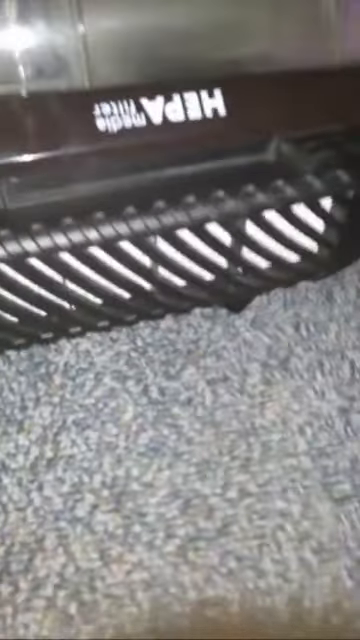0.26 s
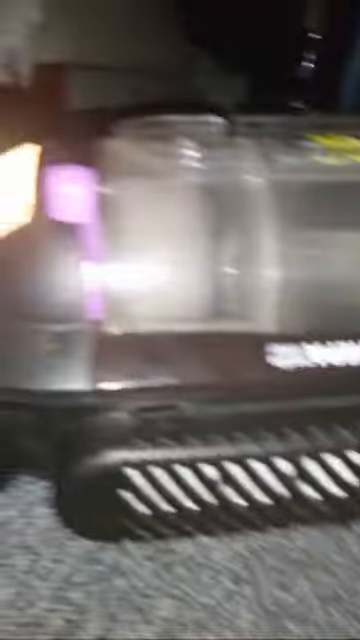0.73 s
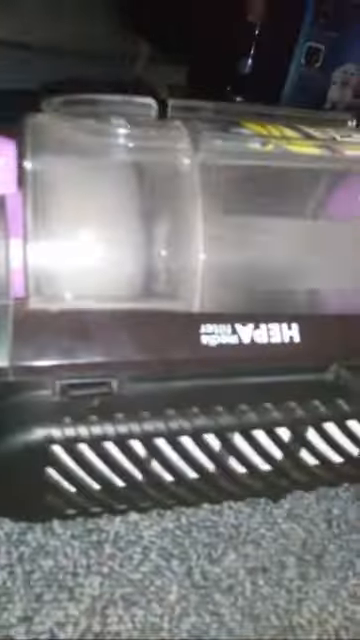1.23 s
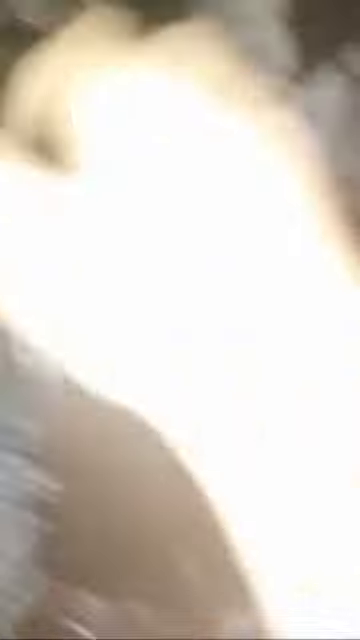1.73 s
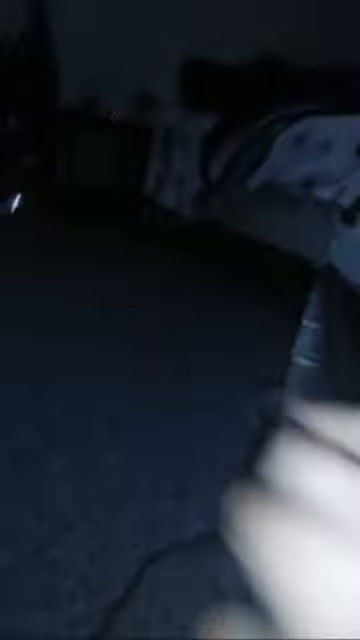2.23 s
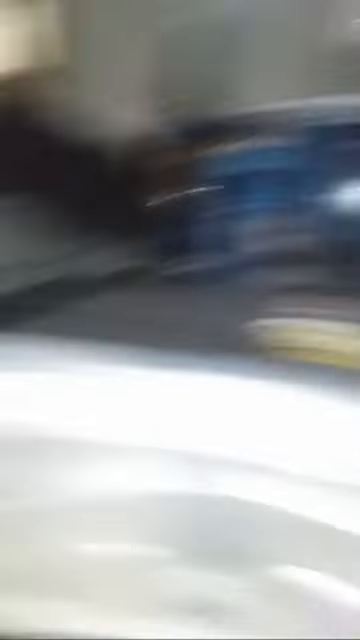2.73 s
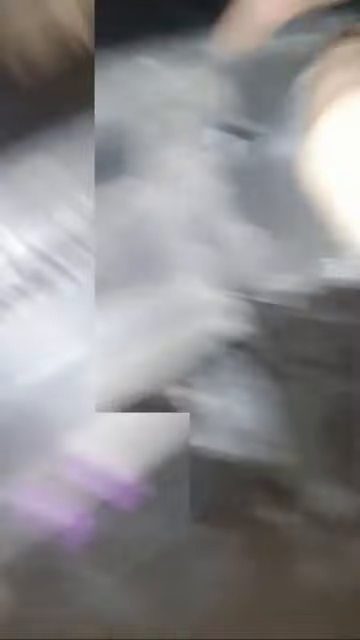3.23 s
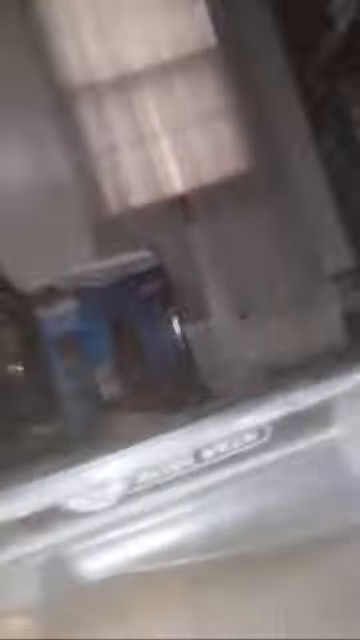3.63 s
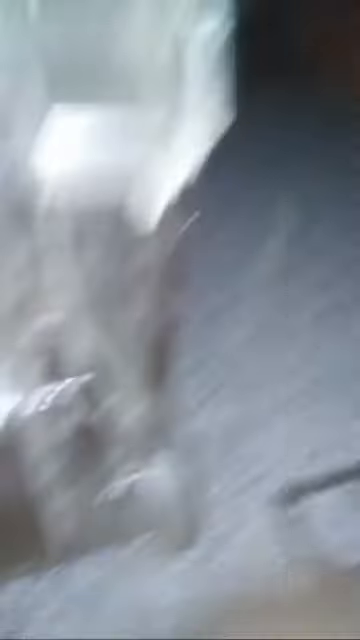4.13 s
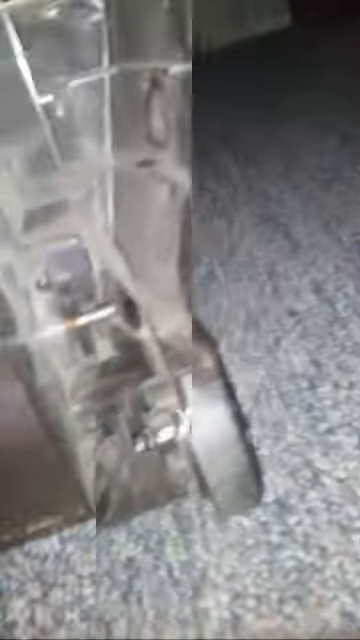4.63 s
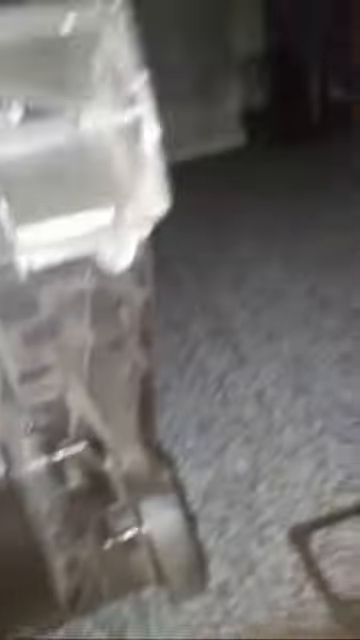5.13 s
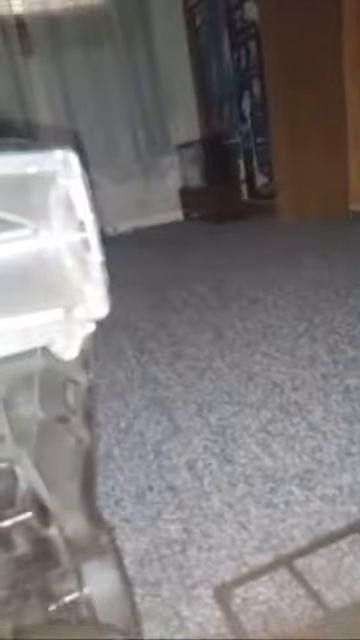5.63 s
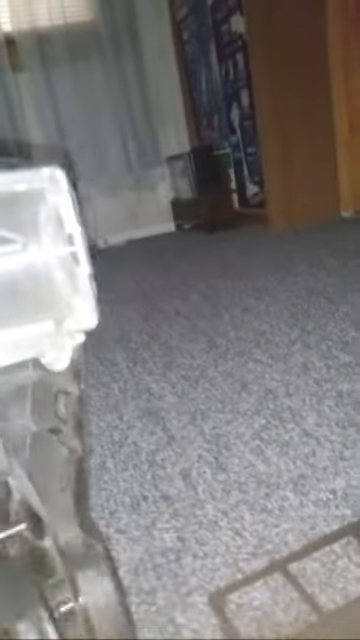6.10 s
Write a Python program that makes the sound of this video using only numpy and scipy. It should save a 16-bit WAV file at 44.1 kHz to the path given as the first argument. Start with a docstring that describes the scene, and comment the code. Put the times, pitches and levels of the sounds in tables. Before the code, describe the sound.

A vacuum motor hums, whines and blows steadily for one second, then loses power and coasts down in one long falling glide, swelling as it passes through resonances of its casing. Over the fading whirr, hollow plastic clacks, soft thuds and tiny gritty scrapes mark rough handling. Dry, close mono sound with a short furnished-room tail; almost only faint low whirring remains at the end.

```python
"""Upright vacuum cleaner, switched off and handled

The cleaner runs on a carpet, then its power is cut and it coasts down while it is tipped and handled.
Its unbalanced rotor hums, air rushes through the ducts, the brushes hiss and sing on a 22-bar commutator.
All the motor tones follow one falling rotor speed; the air and brush noises are shaped random noise.
The plastic body thuds, knocks and scrapes close to a mono microphone in a small furnished room.
"""
import sys
import numpy as np
from scipy import signal
from scipy.fft import rfft, irfft, next_fast_len
from scipy.io import wavfile
from scipy.ndimage import uniform_filter1d, minimum_filter1d, map_coordinates

SR = 44100
rng = np.random.default_rng(int(sys.argv[2]) if len(sys.argv) > 2 else 0)


def materialize(psi):
    """Save the field psi as 16-bit PCM at rate SR to the path in sys.argv[1].

    A 1-D psi becomes a single channel; in a 2-D psi each row is a channel.
    """
    bounded = np.clip(np.atleast_2d(psi).T, -1, 1)
    quanta = np.round(bounded * 32767).astype(np.int16)
    wavfile.write(sys.argv[1], SR, quanta)


N = 280476
FULL_HZ = 460  # rotor turns per second at full speed
OFF_S = 1.073  # the power is cut
TOP_HZ = 15750  # band limit of the sound
SLOW_SHARE = 0.13  # share of full speed below which the brushes sing less and rub more dully


def amp(db):
    """Decibels to gain."""
    return 10 ** (np.asarray(db) / 20)


def unit(x):
    """Scale to rms 1."""
    return x / np.sqrt(np.mean(x ** 2) + 1e-20)


def along(points, hz):
    """(Hz, value) points read on a log axis."""
    f, v = np.transpose(points)
    return np.interp(np.log(hz + 1), np.log(f + 1), v)


def curves(rows):
    """One value per sample for each column after the time."""
    s, *cols = np.transpose(rows)
    return [np.interp(np.arange(N) / SR, s, c) for c in cols]


def wobble(rate):
    """A smooth random curve, rate knots a second."""
    knots = rng.standard_normal(int(N * rate / SR) + 4)
    return map_coordinates(knots, [np.arange(N) * rate / SR])


def filtered(x, response):
    """x times a response of frequency."""
    m = next_fast_len(len(x) + 8192)  # padding keeps the end from wrapping onto the start
    return irfft(rfft(x, m) * response(np.fft.rfftfreq(m, 1 / SR)), m)[:len(x)]


def coloured(x, spectrum):
    """x given a spectrum that falls away beyond its last point, at rms 1."""
    def response(hz):
        return amp(along(spectrum, hz)) / (1 + (hz / spectrum[-1][0] / 2) ** 4)
    return unit(filtered(x, response))


def patchy(x, patchy_db):
    """x with its strength drifting in patches of time and frequency, at rms 1."""
    z = signal.stft(x, nperseg=1024)[2]
    field = uniform_filter1d(rng.standard_normal(z.shape), size=7, axis=0)  # smooth over frequency
    field = uniform_filter1d(field, size=12, axis=1)  # smooth over time
    return unit(signal.istft(z * amp(patchy_db * unit(field)), nperseg=1024)[1][:N])


def turbulence(patchy_db):
    """Eddying white noise."""
    return patchy(rng.standard_normal(N), patchy_db)


def resonances(modes, hz):
    """Gain of steep-sided (Hz, width Hz, dB) resonances for a tone at hz."""
    return sum(amp(db) / (1 + (2 * (hz - centre) / width) ** 2) ** 2 for centre, width, db in modes)


def add(track, s, sound):
    """Mix a sound into a track at time s."""
    part = track[round(s * SR):][:len(sound)]
    part += sound[:len(part)]


# once the power is cut, the speed falls by AIR_DRAG x speed squared + BRUSH_DRAG_HZ_PER_S each second
AIR_DRAG, BRUSH_DRAG_HZ_PER_S = .002155, 15.178
SAG_HZ, SETTLE_S = 11, .12  # the motor is still settling at first


def rotor():
    """Share of full speed and turns made: nearly steady under power, then braked by air and brushes."""
    t = np.arange(N) / SR
    even_hz = np.sqrt(BRUSH_DRAG_HZ_PER_S / AIR_DRAG)  # both drags are equal at this speed
    coasting_s = np.maximum(t - OFF_S, 0)
    hz = even_hz * np.tan(np.arctan(FULL_HZ / even_hz) - AIR_DRAG * even_hz * coasting_s)
    hz = hz - SAG_HZ * np.exp(-t / SETTLE_S)
    return hz / FULL_HZ, np.cumsum(hz) / SR


# resonances of the motor housing; every partial swells as it glides through one:
# [f/Hz, width/Hz, level/dB]
HOUSING = [(1040, 110, -44.5), (1360, 71, -49), (1610, 110, -49), (1775, 100, -50), (2148, 210, -36.5),
           (2580, 240, -40.5), (2940, 230, -42), (3610, 360, -39.5), (4220, 240, -39), (5280, 340, -28.5),
           (5720, 590, -32), (6310, 330, -30.5), (6760, 270, -32), (8390, 1070, -31)]
# what the wall passes between its resonances, and in which band
HOUSING_WALL_DB, WALL_LOW_HZ, HOUSING_WALL_HZ = -48.5, 735, 7000


def housing(hz):
    """Gain of the motor housing for a tone at hz: its resonances over a leak through the wall."""
    wall = amp(HOUSING_WALL_DB) / (1 + (WALL_LOW_HZ / hz) ** 8 + (hz / HOUSING_WALL_HZ) ** 8)
    return resonances(HOUSING, hz) + wall


# low resonances of the body, shaken by the rotor's unbalance: [f/Hz, width/Hz, level/dB]
BODY = [(466.7, 83, -13), (334, 62, -22.5), (270, 93, -31.5), (231, 52, -24), (205.2, 17.5, -24),
        (177, 27, -29.5), (150.2, 41, -26), (116.7, 22, -38.5)]
# fan tones: [multiple of the rotor speed, level/dB into the housing at full speed]
FAN = [(2, 8), (6, 7.5), (12, 6.5), (14, -12)]
# the shaft whirls as it slows through its critical speed: [f/Hz, width/Hz, added gain/dB]
CRITICAL = [(362, 77, 8.5)]
FAN_POWER = 0.79  # the fan tones grow as this power of the speed
MAINS_HZ, COILS_DB, COILS_FADE_S = 60, -30.5, 0.057


def hum(speed, turns):
    """Unbalance shakes the body, fan tones ring the housing; the field coils' buzz fades at power-off."""
    t, hz, angle = np.arange(N) / SR, FULL_HZ * speed, 2 * np.pi * turns
    unbalance = resonances(BODY, hz) * amp(0.37 * wobble(11)) * np.sin(angle)
    fan = np.zeros(N)
    for multiple, db in FAN:
        k = round(multiple)
        level = housing(k * hz) * amp(db + 2.2 * wobble(10))
        fan += level * np.sin(k * angle + .5 * wobble(25))
    fan = fan * speed ** FAN_POWER * (1 + resonances(CRITICAL, hz))
    powered = np.clip((OFF_S - t) / COILS_FADE_S + 1, 0, 1)
    coils = amp(COILS_DB) * powered * np.sin(2 * np.pi * 2 * MAINS_HZ * t)  # twice the mains frequency
    return np.sqrt(2) * (unbalance + fan + coils)


# partials of the commutator and of its uneven wear:
# [multiple of the rotor speed, level/dB into the housing]
WHINE = [(22, -1), (30, -5), (32, -13), (44, -1.5), (66, -4.5), (88, -6), (110, -17), (132, -2), (154, -5),
         (176, -11)]
BARS = 22  # commutator bars
SOFTENING = 0.25  # how much faster the upper partials fade as the brushes slow
CHATTER_RAD, CHATTER_DB = .010, 3.5  # unsteadiness of the brushes' contact


def whine(speed, turns):
    """Brushes tick over the bars; chatter blurs the partials, which flare in the housing's resonances."""
    angle = 2 * np.pi * turns + CHATTER_RAD * wobble(120)
    slowness = 1 + (SLOW_SHARE / speed) ** 6
    out = np.zeros(N)
    for multiple, db in WHINE:
        k = round(multiple)
        hz = k * FULL_HZ * speed
        gain = housing(hz) * (hz < TOP_HZ) / slowness ** (SOFTENING * (k / BARS - 1))
        out += gain * amp(db + CHATTER_DB * wobble(35)) * np.sin(k * angle)
    return np.sqrt(2) * out


# spectrum of the exhaust roar under power: [f/Hz, level/dB per Hz]
ROAR = [(25, -49), (60, -28), (100, -9.5), (160, 0), (235, -6), (330, -7), (520, -4), (660, -3.5),
        (780, -7), (1050, -4.5), (1300, -13.5), (2000, -8.5)]
# spectrum of the coasting machine's low noise: [f/Hz, level/dB per Hz]
COAST = [(25, -40), (60, -12.5), (110, 3.5), (170, -10), (280, 3), (400, 0), (580, -10), (800, -1.5),
         (1050, 2.5), (1350, -3.5), (1500, -7), (1800, 3), (2200, -9)]
# spectrum of the dust bin booming under suction: [f/Hz, level/dB per Hz]
BIN = [(90, -61), (165, -15), (200, 1), (240, 5), (290, -2.5), (420, -16.5)]
ROAR_DB, COAST_DB, BOOM_DB = -19, -11.5, -26
ROAR_POWER, COAST_POWER = 1.79, 1.893  # each layer follows this power of the speed


def exhaust(speed):
    """The exhaust's roar and the dust bin's boom die with the fan and leave the low noise of coasting."""
    roar = amp(ROAR_DB) * speed ** ROAR_POWER * coloured(turbulence(patchy_db=3.33), ROAR)
    coast_gain = amp(COAST_DB) * np.sqrt(np.abs(1 - speed)) * speed ** COAST_POWER
    coast = coast_gain * coloured(turbulence(patchy_db=1.1), COAST)
    boom = amp(BOOM_DB) * speed ** 2 * coloured(rng.standard_normal(N), BIN)
    return amp(1.08 * wobble(13)) * (roar + coast) + boom


def friction(speed, turns, repeat, count=256):
    """Fresh noise and, below half speed, the worn surface that passes the two brushes every half turn."""
    surface = signal.resample(rng.choice([-1, 1], count), count * 16)
    phases = np.exp(1j * np.angle(rfft(surface)))
    surface = irfft(phases * (np.arange(count * 8 + 1) < count / 2))  # partials of equal strength
    worn = np.interp(2 * turns % 1, np.arange(len(surface)) / len(surface), surface)
    # each partial fades in and out among the standing waves
    worn = patchy(worn * np.sqrt(speed), patchy_db=-4.5)
    return repeat * np.clip(1 - 2 * speed, 0, 1) * worn + turbulence(patchy_db=5.0)


# spectrum of the air rushing in the duct: [f/Hz, level/dB per Hz]
DUCT = [(700, -38), (1350, -13), (1750, -3), (2100, 3), (2500, -6.5), (3100, 0), (3700, 5), (4300, 3),
        (4800, 5), (6000, -12)]
# spectrum of the motor casing stirred by the coasting rotor: [f/Hz, level/dB per Hz]
CASING = [(700, -32), (1350, -9.5), (1850, -12), (2300, 2), (2650, 2.5), (3100, 1), (3450, 6), (3720, 8),
          (4200, 3), (4800, 4.5), (6000, -36)]
# midrange as the machine is turned about: [t/s, level/dB]
MID_LEVEL = [(0.0, -18), (1.4, -18), (1.68, -24), (2.99, -35), (3.08, -34), (3.51, -41), (3.74, -40),
             (4.14, -32.5), (4.43, -35.5), (4.82, -31), (5.74, -38), (6.36, -40)]
RUSH_DB, CASING_DB = 0, 1.5


def duct(speed, turns):
    """The rush of air in the duct yields to the casing's own noise as the fan slows."""
    mid_db, = curves(MID_LEVEL)
    rush = amp(RUSH_DB) * np.sqrt(speed) * coloured(turbulence(patchy_db=1.8), DUCT)
    stirred = coloured(friction(speed, turns, repeat=0.58), CASING)
    casing = amp(CASING_DB) * np.sqrt(np.abs(1 - speed)) * stirred
    return amp(mid_db + 0.23 * wobble(12)) * (rush + casing)


# spectrum of the broad hiss under power, as a phone picks it up: [f/Hz, level/dB per Hz]
POWER_HISS = [(3000, -28), (4700, -11.5), (5500, 0), (6100, -4), (7000, -9.5), (7900, -19), (8200, -13.5),
              (8900, -11), (10000, -24.5), (11800, -40), (16000, -60)]
# spectrum of the coasting brushes' hiss, as a phone picks it up: [f/Hz, level/dB per Hz]
BRUSH_HISS = [(3000, -53), (4700, -22), (5200, -1), (5600, 4), (6300, -5), (7200, -4), (7850, -9.5),
              (8200, -5), (9000, -25), (10000, -68), (10800, -39), (11250, -23), (11900, -62)]
# spectrum of the fine top-octave hiss: [f/Hz, level/dB per Hz]
TOP_HISS = [(6000, -23), (9500, -1), (12500, -1), (15500, 1), (17000, -30)]
# treble as the machine is turned about: [t/s, level/dB]
TREBLE_LEVEL = [(0, -17), (0.7, -15), (1.28, -13), (1.72, -22.5), (1.95, -23.5), (2.16, -27), (2.33, -20.5),
                (2.55, -24.6), (2.9, -23.5), (3.2, -24.5), (3.4, -27), (3.68, -30.5), (3.92, -26),
                (4.1, -21), (4.3, -20), (4.52, -30.5), (4.66, -28.5), (4.78, -20.5), (4.9, -22), (5.0, -25),
                (5.14, -22.5), (5.3, -33.5), (5.8, -35), (6.12, -29), (6.35, -32)]
# level of the top octave: [t/s, level/dB]
TOP_LEVEL = [(0.0, -43), (1.06, -39), (1.4, -37), (1.68, -43), (2.25, -41), (4.23, -54), (4.71, -52),
             (5.12, -55), (5.74, -89), (6.36, -89)]
POWER_HISS_DB, BRUSH_HISS_DB, TOP_HISS_DB = -0.5, -0.7, -3.5
STALL_SHARE = 0.15  # share of full speed below which the fan moves next to no air


def hiss(speed, turns):
    """Broad hiss under power gives way to the brushes' hiss, with a fine top-octave hiss that fades out."""
    draught = np.clip((speed - STALL_SHARE) / (1 - STALL_SHARE), .01, 1)
    power_share = np.clip(1.11 * draught, 0, 1)
    broad = coloured(turbulence(patchy_db=2.35), POWER_HISS)
    broad = amp(POWER_HISS_DB) * np.sqrt(power_share) * broad

    brush = coloured(friction(speed, turns, repeat=1.0), BRUSH_HISS)
    brush_top = filtered(brush, lambda hz: 1 / (1 + (6300 / (hz + 1)) ** 16))
    brush = brush - np.clip((SLOW_SHARE - speed) * 18, 0, .8) * brush_top  # slow brushes rub more dully
    pressure = 1 + 0.12 * np.sin(2 * np.pi * turns)  # brush pressure swings once a turn
    brush = amp(BRUSH_HISS_DB) * brush * np.sqrt(1 - power_share) * pressure

    treble_db, = curves(TREBLE_LEVEL)
    top_db, = curves(TOP_LEVEL)
    top = amp(top_db + TOP_HISS_DB + 2.6 * wobble(6.4)) * coloured(rng.standard_normal(N), TOP_HISS)
    return top + amp(treble_db + 1.04 * wobble(14)) * (broad + brush)


# soft bumps: [t/s, level/dB, t60/s]
THUDS = [(2.115, -15.5, 0.11), (2.21, -17, 0.11), (3.755, -24.5, .1), (4.025, -12, 0.15),
         (5.160, -4, 0.054), (5.223, -5.5, 0.093), (5.715, -22, 0.06)]


def thuds():
    """Soft bumps, heard through a microphone whose low cut delays the deepest bass."""
    out, t = np.zeros(N), np.arange(SR // 4) / SR
    swing_hz = 48 + 170 * np.exp(-t / 0.013)  # stands for that delay: low frequencies come later
    swing = np.sin(2 * np.pi * np.cumsum(swing_hz) / SR)
    onset = 1 - np.exp(-t / 0.0098)
    for s, db, t60 in THUDS:
        add(out, s, amp(db - 60 * t / t60) * onset * swing)
    return out


# hard knocks on the plastic body: [t/s, level/dB, ring f/Hz, t60/s, crack level/dB re level]
KNOCKS = [(2.454, -7, 395, 0.033, -7), (2.46, -10.5, 820, 0.051, -12), (2.8531, -7.5, 636, 0.023, -13.5),
          (3.341, -24, 617, 0.038, -3), (3.717, -11.5, 450, 0.03, -7.5), (3.729, -17.5, 400, 0.038, -3.5),
          (3.801, -16.5, 490, 0.016, -20), (4.0117, -8, 740, 0.016, 0.5), (4.0284, 3.5, 1004, 0.0047, -35),
          (4.886, -28, 398, 0.025, -12), (5.162, -20, 260.4, 0.011, 1), (5.283, -4, 606, 0.049, -12.5),
          (5.38, -22, 557, 0.033, -6), (5.706, -19, 376, 0.021, -23), (5.735, -22.5, 410, 0.04, -14),
          (5.996, -17, 810, 0.038, -1.5), (6.299, -44.5, 600, 0.11, 11)]
# ringing of the plastic shell, scattered a little at each blow: [f/Hz, level/dB, t60/s]
SHELL = [(224, -4.5, 0.046), (320, -10, 0.052), (472, -4.5, 0.063), (664, -2, 0.037), (770, -7, 0.05),
         (1100, -16, 0.059), (1530, -15, 0.05), (2340, -18, 0.093)]
# spectrum of the crack at the contact: [f/Hz, level/dB per Hz]
CRACK = [(150, -7), (400, 9), (900, 13), (2200, 9.5), (4200, 9), (6500, 5), (10000, -43), (16000, -44)]


def knocks():
    """Each blow rings the struck panel, stirs the whole shell and cracks at the contact."""
    out, t = np.zeros(N), np.arange(SR // 4) / SR
    for s, db, hz, t60, crack_db in KNOCKS:
        panel = amp(-60 * t / t60) * np.sin(2 * np.pi * hz * t)
        shell = np.zeros(len(t))
        for f, level, life in SHELL:
            decay = amp(level + rng.normal(0, 2.9) - 60 * t / life)
            ring = np.sin(2 * np.pi * f * rng.normal(1, 0.037) * t)
            shell += rng.choice([-1, 1]) * decay * ring
        shell *= amp(-5.5) * min(t60 / 0.039, 1)  # short blows stir the shell less
        crack = amp(crack_db - 60 * t / (1.15 * t60)) * coloured(rng.standard_normal(len(t)), CRACK)
        add(out, s, amp(db) * (panel + shell + crack))
    # small plastic panels radiate little bass
    band = signal.butter(2, [140, 7500], "band", fs=SR, output="sos")
    return signal.sosfilt(band, out)


# plastic parts sliding on each other:
# [t/s, length/s, level/dB, brightest f/Hz, body level/dB re level]
SCRAPES = [(3.453, 0.013, -19.5, 4750, -8), (3.467, 0.014, -10, 4100, -13), (3.48, 0.027, -23, 4230, 2),
           (3.748, 0.039, -28, 5200, -11), (5.165, 0.049, -25, 4060, -1), (5.198, 0.037, -14.5, 4580, 2)]
# spectrum of the duller rub from the body: [f/Hz, level/dB per Hz]
RUB = [(60, -20), (200, -5), (900, -8.5), (2000, -13), (5000, -11), (10000, -26.5), (16000, -48)]
GRIT_DB = 6  # random spread of the grains' strength


def scrapes():
    """Short slides: gritty stick-slip noise through a bright resonance, with a duller rub from the body."""
    out, t = np.zeros(N), np.arange(SR // 8) / SR
    for s, length, db, hz, body_db in SCRAPES:
        grit = rng.standard_normal((2, len(t))) * amp(GRIT_DB * rng.standard_normal(len(t)))

        def resonance(f):
            return 1j * f / (hz * hz - f * f + 1j * f * hz * 0.21) / (1 + (f / 9500) ** 4)
        bright = unit(filtered(grit[0], resonance))
        rub = amp(body_db) * coloured(grit[1], RUB)
        stroke = np.abs(np.sin(np.pi * np.minimum(t / length, 1))) ** 0.32
        add(out, s, amp(db) * stroke * (bright + rub))
    return out


# decay of the room: [f/Hz, t60/s]
ROOM = [(150, 0.31), (1500, 0.13), (10000, 0.057)]


def room(x):
    """The short answer of a carpeted room: a noise tail whose treble dies first."""
    hz, t, z = signal.stft(rng.standard_normal(SR // 3), SR, nperseg=256)
    decay = amp(-60 * t / along(ROOM, hz)[:, None])
    tail = signal.istft(z * decay, SR, nperseg=256)[1]
    return signal.fftconvolve(x, tail / np.linalg.norm(tail))[:N]


ROOM_DB = -17  # room level relative to the direct handling


def scene():
    """Motor and handling noises, heard alike in both channels; only the handling stirs the room."""
    speed, turns = rotor()
    motor = hum(speed, turns) + whine(speed, turns) + exhaust(speed) + duct(speed, turns) + hiss(speed, turns)
    handling = thuds() + knocks() + scrapes()
    mono = motor + handling + amp(ROOM_DB) * room(handling)
    return np.array([mono, mono])


def record(dry):
    """The microphone drops the deepest bass, a fast limiter holds the peaks, then the band limit cuts."""
    def low_cut(hz):
        return 1 / np.sqrt(1 + (46 / (hz + 1)) ** 6)
    sound = np.array([filtered(channel, low_cut) for channel in dry])
    needed = 1 / np.maximum(np.abs(sound).max(axis=0), 1)
    gain = uniform_filter1d(minimum_filter1d(needed, size=90), size=90)  # 90 samples: about 2 ms
    return np.array([filtered(channel * gain, lambda hz: hz < TOP_HZ) for channel in sound])


dry = scene()
out = record(dry)
materialize(out)
```